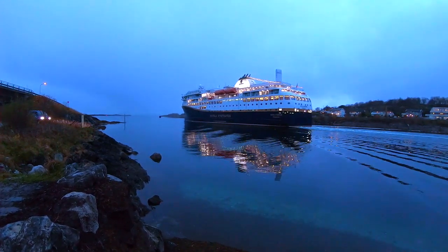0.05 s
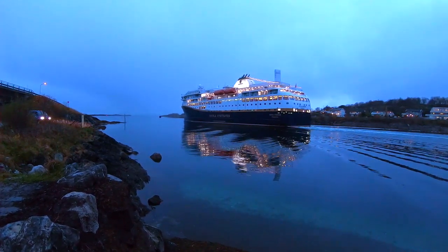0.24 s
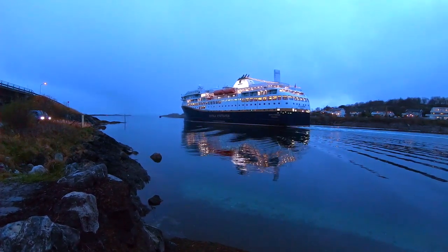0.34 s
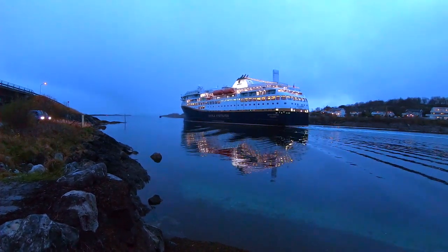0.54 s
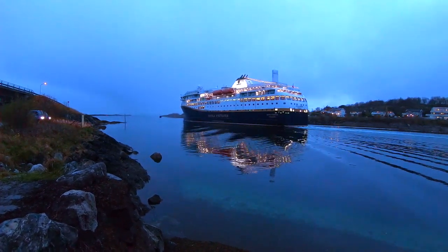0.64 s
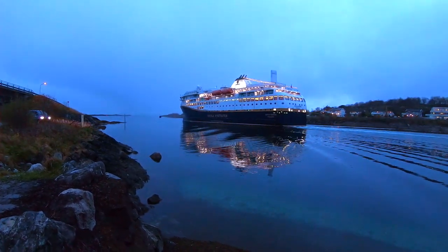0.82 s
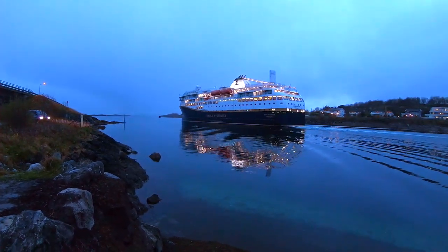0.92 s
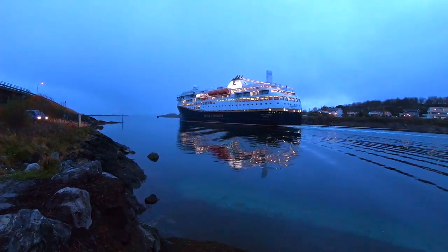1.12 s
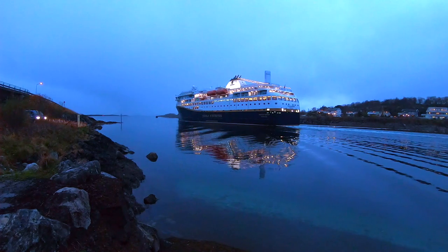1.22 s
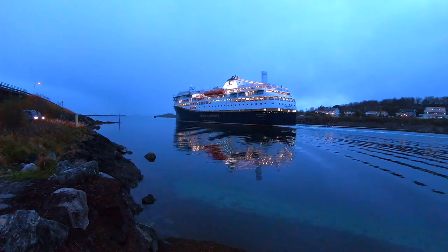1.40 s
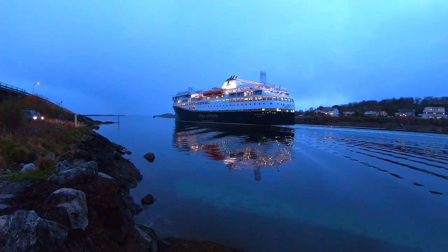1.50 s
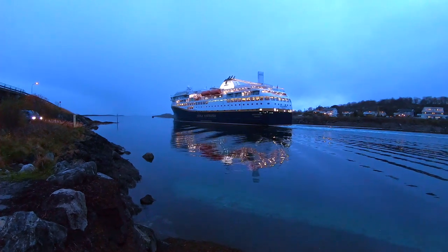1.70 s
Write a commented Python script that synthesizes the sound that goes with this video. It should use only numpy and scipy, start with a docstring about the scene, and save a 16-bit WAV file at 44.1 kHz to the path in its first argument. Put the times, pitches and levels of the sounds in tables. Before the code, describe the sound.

A large ship's horn gives one short, loud toot. From the start, low engines throb under light wind rumble and a soft wash of water. At about 0.7 seconds air hisses, and the deep, raspy horn note sounds from roughly 0.8 to 1.1 seconds. It rings out with faint, dull echoes from the shores, while engines, wind and water continue until about 1.7 seconds.

```python
"""On calm water between shores, a large ship gives one short toot of its air horn.
Compressed air hisses through the valve; the diaphragm starts to swing, slaps shut once a cycle
for a third of a second, then swings out. The air column resonates at harmonics of that cycle,
and the slaps add a rasp. The shores reflect the low notes, over beating engines,
light wind and the wash along the hull."""
import sys
import numpy as np
from scipy import signal
from scipy.fft import rfft, irfft, next_fast_len
from scipy.io import wavfile
from scipy.ndimage import map_coordinates

SR = 44100
rng = np.random.default_rng(int(sys.argv[2]) if len(sys.argv) > 2 else 0)


def store_pcm(level_fs):
    """Save levels as 16-bit WAV."""
    pcm = np.round(np.clip(level_fs, -1, 1) * 32767).astype(np.int16)
    wavfile.write(sys.argv[1], SR, np.atleast_2d(pcm).T)


N = 77175

# an engine note that swells and fades: (time [s], level [dB])
THROB_LEVEL = [(0, -39), (.11, -27), (.16, -33), (.23, -22.5), (.35, -27.5), (.46, -29.5), (.56, -42.5),
               (1.4, -39.5), (1.6, -37), (1.75, -38)]
# machinery rush: (frequency [Hz], relative density [dB])
MACHINERY_SPECTRUM = [(200, -50), (290, 2.5), (410, 3), (500, -10.5), (600, -11.5), (780, -4), (930, -0.5),
                      (1100, -13), (1300, -9.5), (1800, -44.5)]
# its envelope: (time [s], level [dB])
MACHINERY_LEVEL = [(0, -44), (.15, -41.5), (.35, -42.5), (.6, -43.5), (1.2, -48), (1.75, -49)]
# wind rumble: (frequency [Hz], relative density [dB])
WIND_SPECTRUM = [(20, -12), (36, -7), (65, -2), (100, -3.5), (135, -8), (180, -9), (260, -16), (340, -28),
                 (500, -32), (650, -99)]
# its gusts: (time [s], level [dB])
WIND_LEVEL = [(0, -31), (.18, -29.5), (.26, -27.5), (.4, -28), (.5, -32.5), (.7, -24.5), (.95, -35),
              (1.25, -31), (1.5, -35), (1.75, -34.5)]
# water along the hull: (frequency [Hz], relative density [dB])
WASH_SPECTRUM = [(650, -21), (1100, -11.5), (1140, -19), (1290, -9), (1500, -2.5), (2130, -7.5),
                 (3780, -12.5), (8140, -28), (14000, -55)]
# its envelope: (time [s], level [dB])
WASH_LEVEL = [(0, -42.5), (.35, -43), (.62, -41.5), (1.2, -44), (1.5, -46.5), (1.75, -47.5)]
# air escaping at the valve: (frequency [Hz], relative density [dB])
VALVE_SPECTRUM = [(290, -46.5), (500, -16.5), (592, -26), (653, -13), (785, -9), (1120, -29), (1230, -16.5),
                  (1360, -17.5), (1590, -5.5), (1850, -15.5), (2130, 0.5), (2360, -7), (3040, -3.5),
                  (3910, -10.5), (4970, -8), (5260, -11.5), (8140, -17), (8860, -30), (11300, -34),
                  (13300, -42), (14500, -64)]
# its envelope: (time [s], level [dB])
VALVE_LEVEL = [(.664, -61), (.681, -36), (.686, -20.5), (.72, -18.5), (.765, -20), (.805, -24.5),
               (.826, -28), (.84, -31), (.87, -33.5), (1.08, -37.5), (1.105, -33), (1.13, -43),
               (1.17, -108)]
# the diaphragm's rate: (time [s], frequency [Hz])
DIAPHRAGM_RATE = [(.72, 86), (.81, 86.8), (.846, 85.4), (.915, 84.8), (1.08, 84.5), (1.11, 83.1),
                  (1.25, 83.3)]
# air column partials: (harmonic number, level [dB], mid-rise [s], rise constant [s], release [s], T60 [s])
BORE_PARTIALS = [(1, -24, 0.705, 0.018, 1.11, 0.94), (2, -14, .78, 0.021, 1.143, 0.57),
                 (3, -21, .785, 0.011, 1.1, 0.18), (4, -35.5, 0.775, 0.0072, 1.14, 0.45),
                 (5, -28, .8, 0.02, 1.115, 0.34), (6, -36.5, .815, 0.0024, 1.1, 0.2)]
# strength of the slaps: (time [s], level [dB])
SLAP_LEVEL = [(.785, -70), (.812, -77), (.824, -29), (.834, -22.5), (.846, -21), (.86, -24), (.98, -24),
              (1.105, -26.5), (1.118, -36), (1.135, -51), (1.16, -100)]
# the horn bell's response to a slap: (frequency [Hz], relative gain [dB])
BELL_RESPONSE = [(330, -51), (560, -4.5), (668, 1), (914, -0.5), (1080, -14.5), (1220, -0.5), (1390, -9),
                 (1490, 1.5), (1580, -2), (2070, -0.5), (2370, -13.5), (2540, -2.5), (2680, -2), (3030, -4),
                 (3770, -7), (4140, -8), (5010, -9.5), (5370, -22.5), (5750, -10), (6150, -16.5),
                 (6860, -19.5), (8300, -31.5), (9250, -30.5), (11500, -30), (14500, -51)]
# fine jet hiss: (frequency [Hz], relative density [dB])
JET_SPECTRUM = [(3000, -20), (6000, 0), (8300, 1), (9500, -11.5), (11300, -0.5), (14500, -21)]
# reverberation of the shores: (frequency [Hz], T60 [s])
SHORE_DECAY = [(100, 1.4), (400, 1.4), (2000, 1.08), (9000, 0.22)]
# shore reflections: (delay [s], low-frequency gain [dB])
SHORE_ECHOES = [(0.201, -23), (0.429, -30.5), (.66, -23.5)]
# notches in the microphone's response: (centre [Hz], width [Hz], depth [dB])
NOTCHES = [(575, 35, 7), (1115, 45, 8), (1865, 25, 8), (8850, 170, 14)]


def amp(db):
    return 10 ** (np.asarray(db) / 20)


def unit(x):
    return x / np.sqrt(np.mean(x ** 2) + 1e-20)


def clock():
    return np.arange(N) / SR


def bell(x, centre, width):
    return np.exp(-((x - centre) / width) ** 2)


def along(points, hz):
    """(Hz, value) points on a log axis."""
    f, v = np.transpose(points)
    return np.interp(np.log(hz + 1), np.log(f + 1), v)


def curve(points):
    """(s, value) points, one value per sample."""
    return np.interp(clock(), *np.transpose(points))


def wobble(rate):
    """A smooth random curve, rate knots a second."""
    return map_coordinates(rng.standard_normal(int(N * rate / SR) + 4), [clock() * rate])


def filtered(x, response):
    """x times a response of frequency."""
    m = next_fast_len(N + SR)
    return irfft(rfft(x, m) * response(np.fft.rfftfreq(m, 1 / SR)), m)[..., :N]


def causal(gain):
    """The response with this gain that rings only after a pulse."""
    c = irfft(np.log(np.maximum(gain, 1e-6)))
    c[1:len(c) // 2] *= 2
    c[len(c) // 2 + 1:] = 0
    return np.exp(rfft(c))


def noise(spectrum):
    """Coloured noise of rms 1."""
    return unit(filtered(rng.standard_normal(N), lambda hz: amp(along(spectrum, hz))))


def scattered(x, level_db, t60):
    """x with a short, dense ring after it."""
    ring = rng.standard_normal(N) * amp(-60 * clock() / t60)
    return (x + amp(level_db) * signal.fftconvolve(x, ring / np.linalg.norm(ring))[:N]) / np.hypot(1, amp(level_db))


def engine_note(hz, db, in_phase_s=.96):
    """Amplitude and phase modulation: slow random drift roughens a steady tone."""
    phase = 2 * np.pi * hz * (clock() - in_phase_s) + .14 * wobble(4.7)
    return amp(db + 2.2 * wobble(7.5)) * np.sqrt(2) * np.sin(phase)


def engines(mean_hz=49.75, beat_hz=2.05, twin_db=-36.5):
    """Beating: twin engines at close frequencies interfere, with a higher throb and machinery noise."""
    slower = engine_note(mean_hz - beat_hz / 2, twin_db)
    faster = engine_note(mean_hz + beat_hz / 2, twin_db + 2)
    throb = engine_note(hz=73.35, db=curve(THROB_LEVEL))
    machinery = amp(curve(MACHINERY_LEVEL)) * noise(MACHINERY_SPECTRUM)
    return slower + faster + throb + machinery


def wind():
    """Turbulence: low-frequency noise rises and falls with the gusts."""
    return amp(curve(WIND_LEVEL)) * noise(WIND_SPECTRUM)


def hull_wash():
    """Flow noise: water along the hull gives a broad, slightly wavering hiss."""
    return amp(curve(WASH_LEVEL) + .5 * wobble(11)) * noise(WASH_SPECTRUM)


def valve_hiss(turns):
    """Modulated flow: air hisses, is increasingly chopped at the horn's pitch, and ends in a puff."""
    depth_db = curve([(.745, 0), (.81, 5.2)])
    chop_db = depth_db * np.cos(2 * np.pi * (turns - .1))
    cavity_hiss = scattered(noise(VALVE_SPECTRUM), level_db=-12, t60=.06)
    return amp(curve(VALVE_LEVEL) + chop_db) * cavity_hiss


def diaphragm_turns(shut_s=.8456):
    """Phase is the integral of frequency: the diaphragm shuts at whole numbers of cycles."""
    turns = np.cumsum(curve(DIAPHRAGM_RATE)) / SR
    return turns - np.interp(shut_s, clock(), turns)


def bore_tone(turns, bore_lag_s=.00615, resonance_lag_s=.00054):
    """Air column resonance: harmonics build up and ring out, cresting half a cycle after each slap."""
    t, tone = clock(), np.zeros(N)
    swing_db = 7 * bell(t, centre=.775, width=.14)  # the fundamental leads
    surge_db = 5.5 * bell(t, centre=.834, width=.012)  # upper partials overshoot as the horn catches
    for k, db, mid_rise, rise, release, t60 in BORE_PARTIALS:
        lag_s = bore_lag_s + (k == 2) * resonance_lag_s  # the second sits on the bore's resonance
        phase = 2 * np.pi * (turns - lag_s * curve(DIAPHRAGM_RATE))
        decay_db = 60 * np.maximum(t - release, 0) / t60
        level_db = db - decay_db + (k == 1) * swing_db + (k > 2) * surge_db
        attack = (1 + np.tanh((t - mid_rise) / rise / 2)) / 2
        tone += amp(level_db) * attack * np.sqrt(2) * np.cos(k * phase)
    return tone


def slap_rasp(turns, crossover_hz=564, top_hz=14700, left_lead_s=13e-6):
    """Impulse excitation: each closure emits a pulse, filtered by the bell and scattered by the decks."""
    def response(hz):
        resonances = causal(amp(along(BELL_RESPONSE, np.clip(hz, crossover_hz, top_hz))))
        return resonances / (1 + (crossover_hz / (hz + 1)) ** 20)  # the bore's partials take over below

    closures = np.arange(np.ceil(turns[0]) + 1, turns[-1] - 1)
    positions = np.interp(closures, turns, np.arange(N))[:, None]
    taps = positions.astype(int) + np.arange(-7, 9)
    offsets = taps - positions
    shapes = np.sinc(offsets) * np.cos(np.pi * offsets / 16) ** 2  # band-limited impulses
    strengths = amp(.4 * rng.standard_normal(positions.shape))
    pulses = np.bincount(taps.ravel(), (shapes * strengths).ravel(), N)
    slaps = filtered(pulses * amp(curve(SLAP_LEVEL)), response) / np.std(filtered(pulses, response))
    slaps = scattered(slaps, level_db=-12, t60=.035)
    return filtered(slaps, lambda hz: np.exp(1j * np.pi * left_lead_s * np.array([hz, -hz])))


def jet_hiss(gain_db=-26):
    """Jet noise: a fine, high hiss follows the strength of the slaps."""
    return amp(curve(SLAP_LEVEL) + gain_db) * noise(JET_SPECTRUM)


def shore_reflections(x, tail_db=-18.5, tail_low_hz=219, tail_top_hz=1210, echo_top_hz=694):
    """Reflection: the shores return a diffuse tail and three dull, delayed echoes."""
    hz, t, spectra = signal.stft(rng.standard_normal(N), SR, nperseg=256)
    decay = amp(-60 * t / along(SHORE_DECAY, hz)[:, None])
    build_up = np.minimum(t / .018, 1)
    tail = signal.istft(spectra * decay * build_up, SR, nperseg=256)[1]
    diffuse = signal.fftconvolve(x, tail / np.linalg.norm(tail))[:N]
    # rough shores return the overtones better than the bass
    high_pass = lambda hz: (1j * hz / (tail_low_hz + 1j * hz)) ** 2
    diffuse = filtered(diffuse, lambda hz: high_pass(hz) / (1 + 1j * hz / tail_top_hz))
    delays = lambda hz: sum(amp(db) * np.exp(-2j * np.pi * hz * s) for s, db in SHORE_ECHOES)
    echoes = filtered(x, lambda hz: delays(hz) / (1 + 1j * hz / echo_top_hz))
    return amp(tail_db) * diffuse + echoes


def scene():
    """Superposition: engines, wind and water add to the horn and its reflections."""
    background = engines() + wind() + hull_wash()
    turns = diaphragm_turns()
    horn = valve_hiss(turns) + bore_tone(turns) + slap_rasp(turns) + jet_hiss()
    return background + horn + shore_reflections(horn.mean(axis=0))


def record(dry, top_hz=14700):
    """Linear filtering: the microphone imposes narrow notches and a band limit."""
    loss_db = lambda hz: sum(db * bell(hz, centre, width) for centre, width, db in NOTCHES)
    return filtered(dry, lambda hz: causal(amp(-loss_db(hz))) * (hz < top_hz))


dry = scene()
out = record(dry)
store_pcm(out)
```